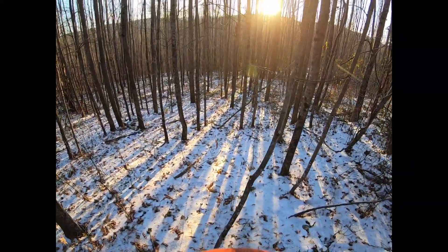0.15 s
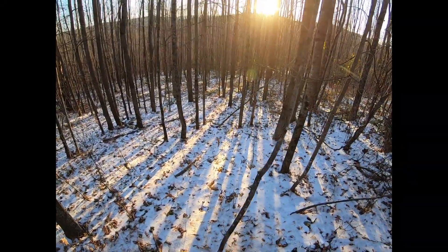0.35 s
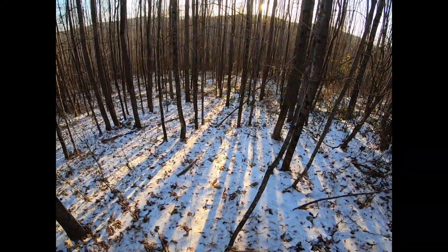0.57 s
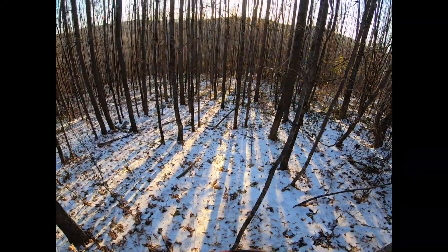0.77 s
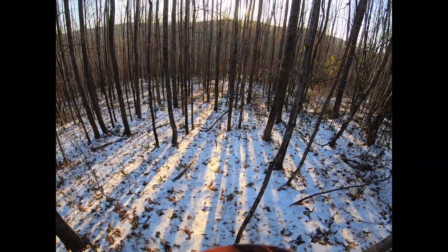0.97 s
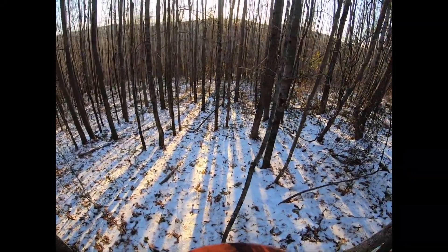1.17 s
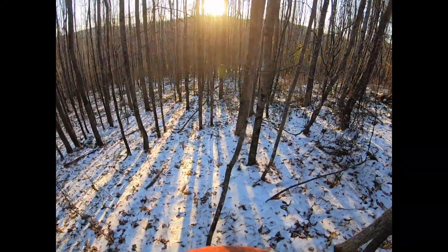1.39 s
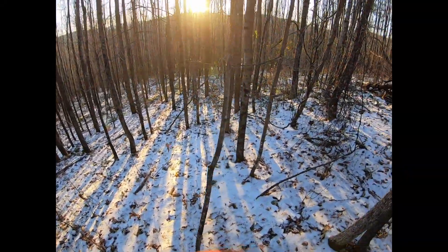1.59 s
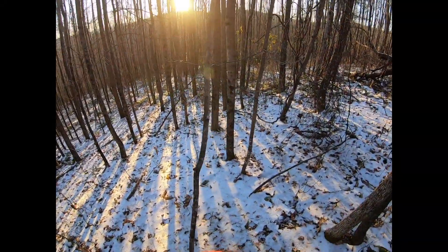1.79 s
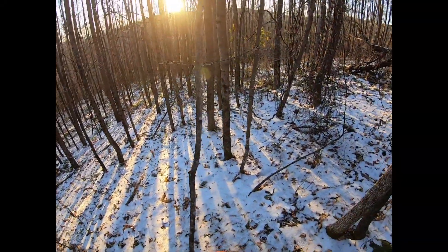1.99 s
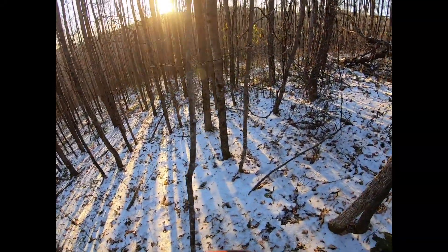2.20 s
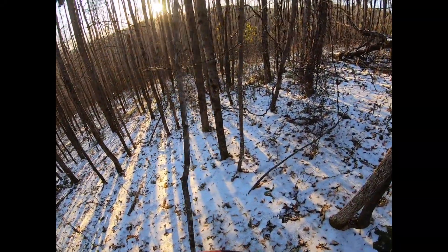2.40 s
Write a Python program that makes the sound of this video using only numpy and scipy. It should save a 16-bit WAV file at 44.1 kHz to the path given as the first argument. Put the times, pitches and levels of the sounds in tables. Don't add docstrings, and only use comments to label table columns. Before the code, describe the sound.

Boots crunch through thin snow over dry leaves, two long treads, then small crackling shifts in quiet woods

```python
import sys
import numpy as np
from scipy import signal
from scipy.fft import rfft, irfft
from scipy.io import wavfile
from scipy.ndimage import uniform_filter1d

SR = 44100
rng = np.random.default_rng(int(sys.argv[2]) if len(sys.argv) > 2 else 0)


def inscribe(sig):
    pcm = np.round(np.clip(np.atleast_2d(sig).T, -1, 1) * 32767)
    wavfile.write(sys.argv[1], SR, pcm.astype(np.int16))


def natural_amplitude(level_db):
    exponent = np.asarray(level_db, float) / 20
    return 10 ** exponent


N = 108045

# hz, db_per_hz
HUM_COLOUR = [(100, -34), (130, -10), (155, -3), (190, 0), (225, -4), (265, -22), (400, -42)]
WIND_COLOUR = [(15, -20), (40, 3), (65, -10.5), (100, -11.5), (200, -28)]
HISS_COLOUR = [(350, 5), (700, 7.5), (1300, -5), (3000, -46), (6000, -6.5), (13500, -27.5)]
# time_s, level_db
GUSTS = [(0.0, -62), (0.14, -89), (0.18, -58.5), (0.41, -77), (0.46, -53.5), (0.54, -82), (0.56, -69),
         (0.8, -101), (1.19, -61), (1.29, -71), (1.32, -63), (1.73, -69), (1.759, -47.5), (1.81, -66),
         (2.1, -63), (2.11, -70), (2.24, -62), (2.45, -82)]
# time_s, snow_weight_db, leaf_scuff_db
SHIFT_BEFORE = [
    (0, -63.5, -66),
    (.1, -60, -65.5),
    (.17, -59.5, -63),
]
# time_s, snow_weight_db, leaf_scuff_db
FIRST_TREAD = [
    (.19, -57.5, -74),
    (0.241, -55, -49.5),
    (.265, -46.5, -45.5),
    (.36, -45.5, -41),
    (.4, -42, -38),
    (.55, -43, -37),
    (.7, -43, -40),
    (.79, -46.5, -37.5),
    (.803, -46, -42),
]
# time_s, snow_weight_db, leaf_scuff_db
SECOND_TREAD = [
    (0.918, -49, -48),
    (0.938, -41.5, -43),
    (0.988, -39.5, -37),
    (1.06, -39.5, -40),
    (1.13, -39, -38.5),
    (1.215, -41, -40),
    (1.23, -47, -44.5),
    (1.33, -56.5, -54.5),
    (1.45, -65, -60),
]
# time_s, snow_weight_db, leaf_scuff_db
SHIFT_AFTER = [
    (1.52, -77, -65),
    (1.62, -67, -61.5),
    (1.735, -73, -71),
    (1.76, -72, -63),
    (1.9, -58, -55),
    (2.05, -67, -55.5),
    (2.198, -62, -52),
    (2.32, -83, -65),
    (2.45, -74, -70.5),
]
# time_s, peak_db,
# ring_hz, crumble_db, crunch_db
SNAPS = [(0.2245, -39.5, 890, -11, -26), (0.25, -29, 550, -9, -21), (0.261, -33, 830, -16, -27),
         (0.376, -29.5, 600, -15, -9.5), (0.514, -26.5, 1170, -29, -21), (0.58, -31, 540, -17, -23),
         (0.597, -27.5, 935, -8.5, -6.5), (0.6442, -27.5, 820, -11, -7),
         (0.744, -26.5, 750, -33, -14.5), (0.757, -26.5, 545, -26, -11),
         (0.796, -27.5, 585, -15, -16), (1.3012, -41.5, 1010, -4.5, -20),
         (1.313, -35.5, 3130, -22, -36), (1.365, -44.5, 590, -25, -7), (2.0004, -36.5, 2880, -8, -20),
         (1.479, -56, 1460, -25.5, 0),
         (1.528, -37, 1330, -11.5, -8.5), (1.536, -39, 970, -23, -8.5), (1.547, -44.5, 530, -4, 4.5),
               (1.6026, -42, 930, -25, -10), (1.748, -47, 2670, -31, -32), (1.7685, -47.5, 1220, -23, -28),
               (1.789, -47.5, 503, -7, -5), (1.8192, -38, 3030, -10, -7), (1.873, -33.5, 3120, -24, -19),
               (1.881, -37, 3300, -5, -17), (1.8859, -29, 860, -8, -12.5), (1.918, -44, 1180, -19, -17),
               (1.983, -33.5, 803, -16, -10.5), (2.004, -35, 3100, -5.5, -12), (2.08, -27, 3330, -13, -21),
               (2.1379, -23, 3200, -12.5, -13.5), (2.1411, -26.5, 1970, -15.5, -12.5),
               (2.1816, -37, 2900, -22, -8.5), (2.205, -60, 2470, -26, -21), (2.231, -54, 4200, -29, -27),
               (2.2644, -51, 3600, -11, -6), (2.3352, -48.5, 2560, 1, -6),
         (0.028, -47, 2850, -41, -29),
    (0.1983, -46, 2720, -7, -3),
    (0.8386, -29, 1110, -22, -21),
    (0.9398, -37.5, 3300, 1, -20),
    (1.2672, -40.5, 3050, -10, -15),
    (1.3502, -37.5, 1500, -18, -9),
    (1.495, -54.5, 2060, 2, -8),
]
# time_s, level_db, pitch_hz
LEAF_CRACKS = [(0.2988, -32, 2450), (0.3013, -35, 1820), (0.3231, -37, 2110), (0.3325, -30.5, 2000),
               (0.3613, -29.5, 3170), (0.3867, -26, 3150), (0.647, -24, 3270), (0.6532, -25.5, 3400),
               (0.7225, -32, 1550), (0.8477, -31, 2670), (0.8516, -32, 2670), (0.9411, -38, 2320),
               (0.9817, -27, 2140), (1.0092, -40, 1890), (1.0342, -35, 2130), (1.043, -33, 2310),
               (1.1459, -31.5, 2110), (1.1931, -24.5, 3100), (1.2031, -34, 2580), (1.2182, -37, 2060),
               (0.0784, -46, 1300), (0.1057, -48.0, 1240), (0.1092, -44, 1610), (1.3714, -39, 1550),
                (1.3783, -38.5, 1220), (1.4253, -45.5, 3050), (1.4389, -51.0, 1620), (1.5326, -41, 1210),
                (1.5482, -44.5, 900), (1.6147, -55, 1020), (1.6399, -62, 3080), (1.663, -57, 1360),
                (1.6924, -54.0, 1430), (1.711, -56, 1440), (1.752, -47, 2820), (1.8235, -41.5, 900),
                (1.8917, -36, 1310), (1.8932, -43, 1730), (1.9454, -44, 2770), (1.951, -49, 2520),
                (1.978, -41, 1250), (2.0058, -37.0, 3270), (2.0097, -41.0, 1700), (2.081, -39, 3300),
                (2.143, -30, 1140), (2.3394, -51, 2450), (2.3408, -65, 2470), (2.3435, -39, 5400),
                (2.3463, -48, 5300)]
# time_s, level_db, pitch_hz
LUMPS = [(0.2875, -32, 940), (0.3482, -37.0, 1070), (0.4368, -45, 358), (0.4539, -46, 680),
         (0.4771, -35, 452), (0.4884, -34.5, 407), (0.6256, -32, 523), (0.6497, -28.5, 1060),
         (0.6563, -40, 537), (0.6912, -43, 490), (0.7216, -36.5, 663), (0.7511, -32, 567),
         (0.7764, -32, 1200), (0.8629, -40, 442), (0.9284, -30.5, 640), (0.9772, -32.5, 606),
         (0.9876, -32, 397), (0.993, -33, 536), (1.0023, -33.5, 402), (1.0349, -36.5, 426),
         (1.077, -34, 755), (1.0828, -32, 268), (1.0934, -39, 427), (1.1036, -41, 740), (1.1487, -33, 750),
         (1.1532, -38, 416), (1.1781, -32.5, 410), (1.1997, -26.5, 1370), (1.2115, -35, 1280),
         (1.2176, -43, 352), (1.2432, -42.5, 480)]
# hz, db_per_hz
SNOW_COLOUR = [(330, -10), (500, 0), (750, -2), (1000, 1.5), (1400, -3), (2000, -6.5), (3000, -9)]
PACK_COLOUR = [(150, -38), (200, 2.5), (270, -6.5), (400, 2), (550, -9), (750, -10.5)]
LEAF_COLOUR = [(600, -2.5), (1200, -2.5), (2000, -3), (3300, -1), (4400, -6), (7500, -7.5), (11000, -19.5),
               (15000, -52)]
CRUMB_COLOUR = [(600, -12.5), (1200, -8), (2000, -9), (3200, 0), (4500, -8.5), (7000, -4.5), (10000, -6.5),
                (14000, -35)]
# hz, correlation
PORT_LIKENESS = [(60, -0.9), (130, 0.9), (300, 1), (640, 0.8), (1300, 0.32), (2600, 0.73), (5000, 0.35),
                 (8000, -0.1)]
# hz, left_over_right_db
PORT_LEAN = [(60, 11), (150, -0.5), (380, 0), (950, -4.5), (2370, -1.5), (5960, -2.5), (14900, 1)]

SNAP_SIDE, SNAP_WIDTH = -0.37, 0.41
DULL_HZ = 7400


def evened(x):
    return x / np.sqrt(np.mean(x ** 2) + 1e-20)


def read(points, hz):
    f, db = np.transpose(points)
    return np.interp(np.log(hz + 1), np.log(f + 1), db, db[0] - 40, db[-1] - 40)


def shaped(x, gain):
    hz = np.fft.rfftfreq(x.shape[-1], 1 / SR)
    return irfft(rfft(x) * gain(hz), N)


def noise(colour, channels):
    white = rng.standard_normal((channels, N))
    return evened(shaped(white, lambda hz: natural_amplitude(read(colour, hz))))


def drift(top_hz):
    white = rng.standard_normal(N)
    return evened(shaped(white, lambda hz: (hz < top_hz) / np.sqrt(hz + top_hz / 8)))


def far_hum():
    level_db, rise_db_per_s, waver_hz = -64, 2.13, 23.0
    t = np.arange(N) / SR
    return natural_amplitude(level_db + rise_db_per_s * t + drift(waver_hz)) * noise(HUM_COLOUR, channels=2)


def wind():
    lump_db, lump_hz, leak, lean_db = 0.86, 27.0, 0.25, 1.8
    level_db = np.interp(np.arange(N) / SR, *np.transpose(GUSTS)) + lump_db * drift(lump_hz)
    own = noise(WIND_COLOUR, channels=2)
    return (own + leak * own[::-1]) * natural_amplitude(level_db - lean_db * np.array([[1], [-1]]))


def hiss():
    level_db = -69.5
    return natural_amplitude(level_db) * noise(HISS_COLOUR, channels=2)


def ping(hz, cycles):
    u = np.arange(1024) * hz / SR / cycles
    return 2 * np.e * u * np.exp(-2 * u) * np.sin(2 * np.pi * u * cycles)


def grains(colour, per_s, spread_db, cycles, count):
    out = np.zeros((2, N))
    pitches_hz = np.geomspace(colour[0][0], colour[-1][0], count)
    for hz in pitches_hz:
        rate_per_s = per_s * np.sqrt(hz / np.median(pitches_hz))
        draw = rng.random((2, N)) * SR / rate_per_s
        hit = draw < 1
        size = np.minimum(-np.log(2 * draw[hit] % 1 + 1e-9), 5)
        train = np.zeros((2, N))
        train[hit] = natural_amplitude(spread_db * size) * np.sign(draw[hit] - .5)
        rung = signal.oaconvolve(train, ping(hz, cycles)[None], axes=1)[:, :N]
        out += natural_amplitude(read(colour, hz)) * np.sqrt(hz) * evened(rung)
    return evened(out)


def tread_power():
    clumps_per_s, snow_clump_db, leaf_clump_db = 160., 0.5, 0.45
    rows = SHIFT_BEFORE + FIRST_TREAD + SECOND_TREAD + SHIFT_AFTER
    time_s, weight_db, scuff_db = np.transpose(rows)
    t, clump = np.arange(N) / SR, drift(clumps_per_s)
    snow = natural_amplitude(2 * (np.interp(t, time_s, weight_db) + snow_clump_db * clump))
    leaf = natural_amplitude(2 * (np.interp(t, time_s, scuff_db) + leaf_clump_db * clump))
    return snow, leaf


def snaps():
    ring_db, ring_cycles, overtone_db = -3, 4.2, -3
    twig_hz, tick_db, tick_cycles = 3200., -5, 1.3
    rise_s, crumble_t60_s = .0012, 0.065
    u = np.arange(8192) / SR
    flare = np.minimum(u / rise_s, 1) * natural_amplitude(-2 * 60 * u / crumble_t60_s)
    tick = natural_amplitude(tick_db) * ping(twig_hz, tick_cycles)
    rings, crunch, crumb = np.zeros((2, N + 1024)), np.zeros(N), np.zeros(N)
    for time_s, peak_db, hz, crumble_db, crunch_db in SNAPS:
        k = round(time_s * SR)
        crunch[k:k + len(u)] += flare[:N - k] * natural_amplitude(2 * (peak_db + crunch_db))
        crumb[k:k + len(u)] += flare[:N - k] * natural_amplitude(2 * (peak_db + crumble_db))
        crack = ping(hz, ring_cycles * (hz / twig_hz) ** 0.8) + tick
        crack = crack + natural_amplitude(overtone_db) * ping(1.67 * hz, 2.6)
        place = np.array([[1], [SNAP_SIDE + SNAP_WIDTH * rng.uniform(-1.3, 1)]])
        rings[:, k:k + len(crack)] += natural_amplitude(peak_db + ring_db) * crack * place
    return rings[:, :N], crunch, crumb


def breaks():
    out = np.zeros(N + 1024)
    for rows, cycles in ((LEAF_CRACKS, 1.84), (LUMPS, 2.2)):
        for time_s, level_db, hz in rows:
            ring = ping(hz, cycles) - natural_amplitude(-9.5) * ping(2.28 * hz, cycles)
            k = round(time_s * SR)
            out[k:k + len(ring)] += natural_amplitude(level_db - 1) * ring
    return out[:N] * np.array([[1], [SNAP_SIDE]])


def dull(hz):
    return 1 / np.sqrt(1 + (hz / DULL_HZ) ** 6)


def underfoot():
    pack_db, pack_growth, full_weight_db = -41, 1.62, -38.5
    snow, leaf = tread_power()
    rings, crunch, crumb = snaps()
    snow_gain = np.sqrt(snow + crunch)
    pack_gain = natural_amplitude(pack_db) * (snow_gain / natural_amplitude(full_weight_db)) ** pack_growth
    settling = abs(uniform_filter1d(crumb, size=900, origin=400))
    leaf_gain = np.sqrt(leaf + .5 * settling)
    crumb_gain = np.sqrt(abs(uniform_filter1d(crumb, size=90, origin=40)))
    out = snow_gain * grains(SNOW_COLOUR, per_s=200, spread_db=2, cycles=1.86, count=10)
    out += pack_gain * grains(PACK_COLOUR, per_s=220., spread_db=3.7, cycles=1.82, count=8)
    out += leaf_gain * grains(LEAF_COLOUR, per_s=600, spread_db=1.5, cycles=1.8, count=20)
    crumbs = crumb_gain * grains(CRUMB_COLOUR, per_s=1500., spread_db=2.7, cycles=1.26, count=10)
    return out + shaped(rings + breaks() + crumbs, dull)


def tail(t60_s):
    taps = rng.standard_normal(8000) * natural_amplitude(-60 * np.arange(8000) / SR / t60_s)
    return taps / np.linalg.norm(taps)


def port_value(points, hz):
    f, value = np.transpose(points)
    return np.interp(np.log(hz + 1), np.log(f), value)


def ports(x):
    ground_t60_s, ground_db = .1, -18.
    near, apart = (v + natural_amplitude(ground_db) * signal.oaconvolve(v, tail(ground_t60_s))[:N] for v in x)

    def same(hz):
        return np.clip(port_value(PORT_LIKENESS, hz), -1, 1)

    mid = shaped(near, lambda hz: np.sqrt((1 + same(hz)) / 2))
    side = shaped(apart, lambda hz: np.sqrt((1 - same(hz)) / 2))
    left = shaped(mid + side, lambda hz: natural_amplitude(port_value(PORT_LEAN, hz) / 2))
    right = shaped(mid - side, lambda hz: natural_amplitude(-port_value(PORT_LEAN, hz) / 2))
    return np.array([left, right])


def scene():
    return ports(far_hum() + underfoot()) + wind() + hiss()


def roll_off(x):
    return signal.sosfilt(signal.butter(12, 15540, fs=SR, output="sos"), x)


def record(dry):
    edge_hz, slope_hz = 15650, 240.0
    mix = shaped(dry, lambda hz: np.clip((edge_hz - hz) / slope_hz, 0, 1))
    return roll_off(mix)


dry = scene()
out = record(dry)
inscribe(out)
```